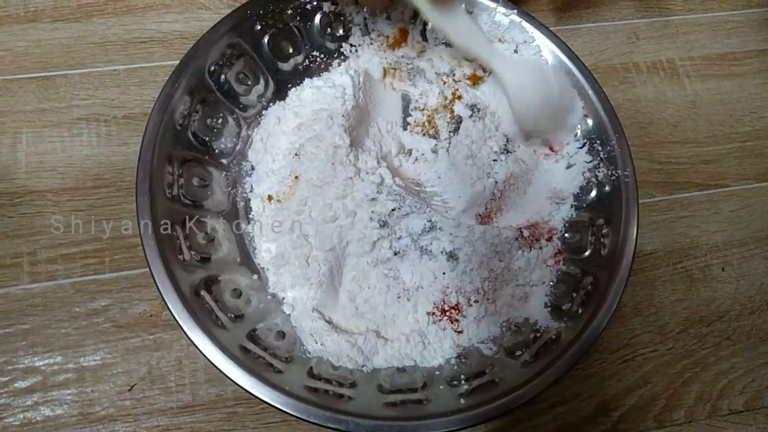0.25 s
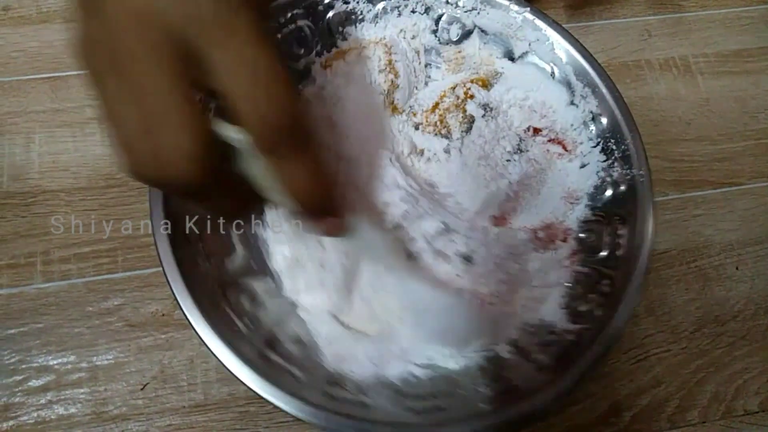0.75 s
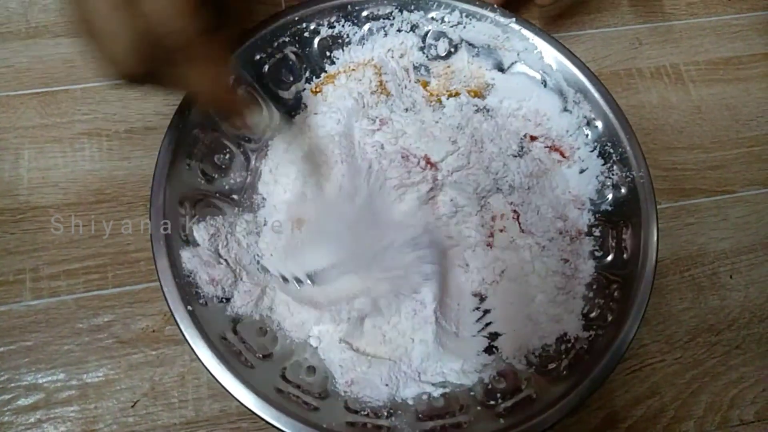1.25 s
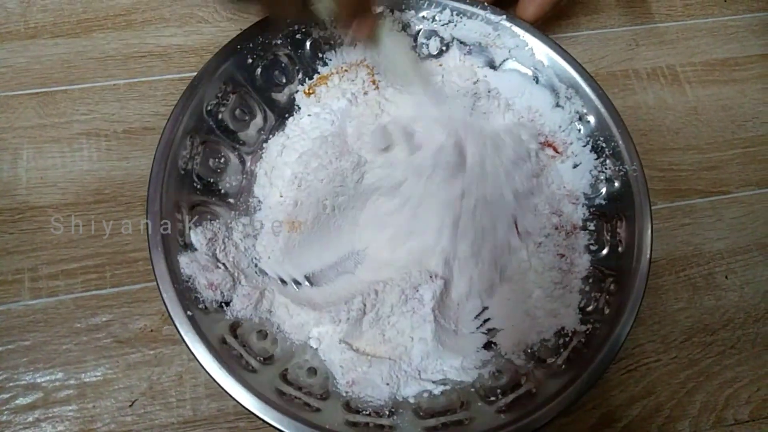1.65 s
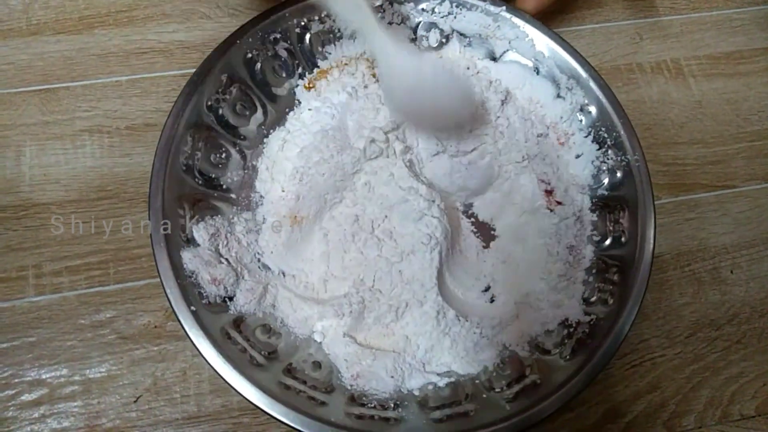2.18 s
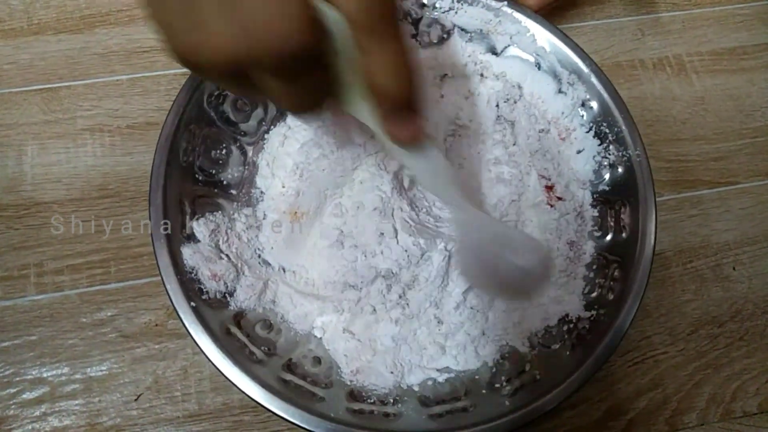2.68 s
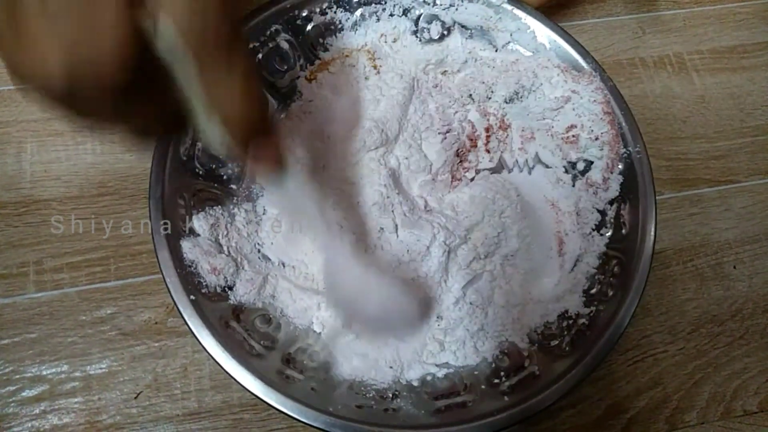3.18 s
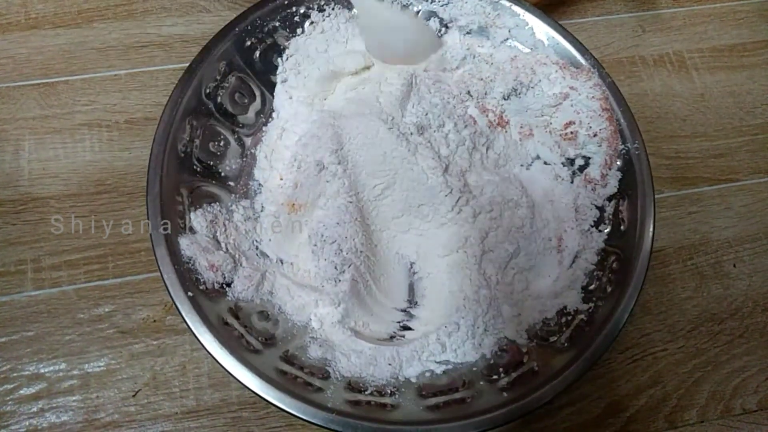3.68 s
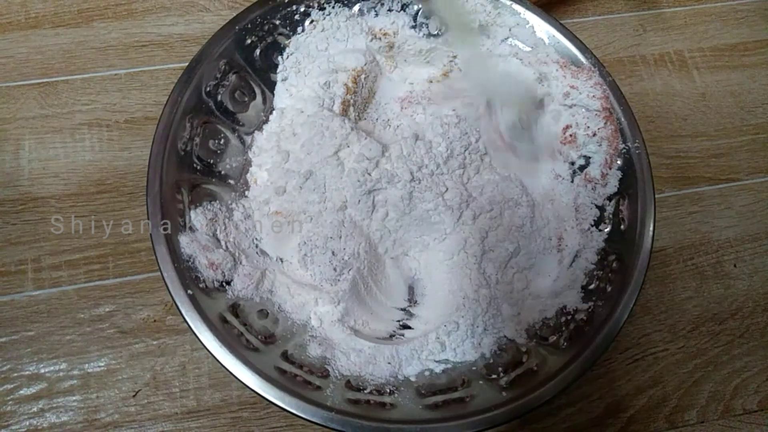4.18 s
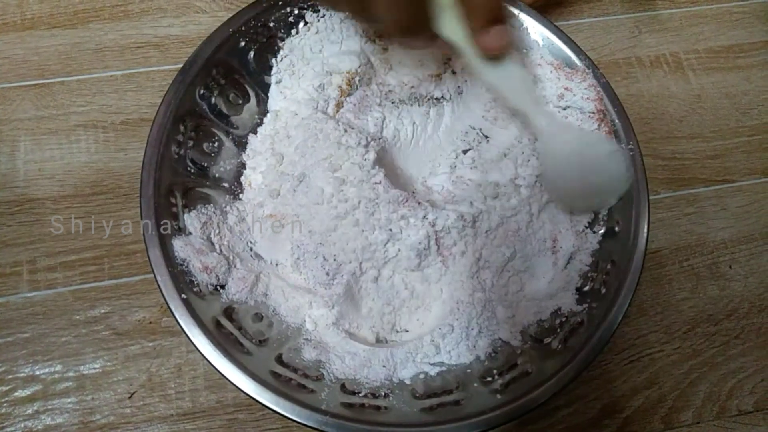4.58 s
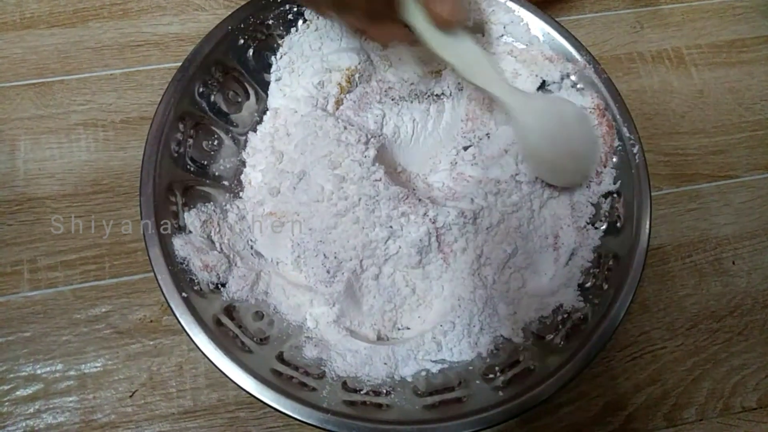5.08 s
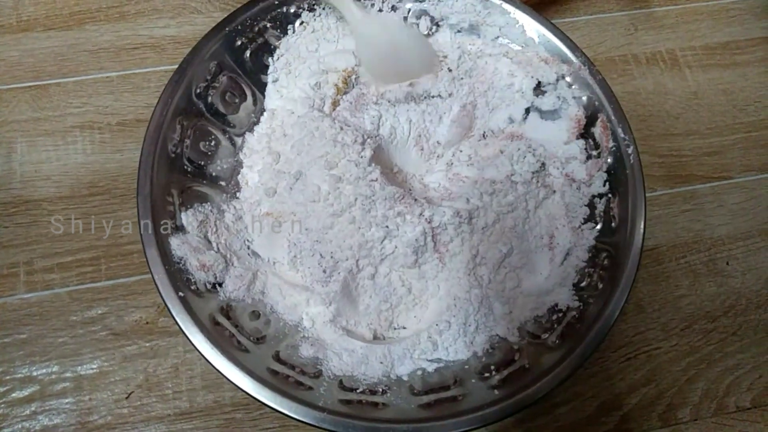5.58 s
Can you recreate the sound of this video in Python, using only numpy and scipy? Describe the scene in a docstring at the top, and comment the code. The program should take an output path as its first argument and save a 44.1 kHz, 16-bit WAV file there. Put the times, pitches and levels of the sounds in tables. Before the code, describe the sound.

In a small quiet kitchen, close to the microphone, a spoon works through powder in a metal dish. Irregular short scrapes come with gaps between them: some only muffled swishes, others ending in gritty scratches and clacks. A hard hollow rattle at three seconds is followed by more scrapes, a tapping cluster past four, and firm knocks after five. Low hum and rumble run underneath.

```python
"""Small kitchen with a low rumble, wavering hums and faint hiss: filtered noise and sines.
A plastic spoon stirs dry flour in a steel plate. Strokes land, glide and mostly dig in, as trains of tiny slips.
The slips drive four responses: drumming plate, ringing spoon, hiss through flour, bright scratch on bare steel.
Spoon contacts give knocks and ticks: a click plus a noisy skid into the same four responses.
Packed flour crunches: short narrow-band noise. Sparse decaying echoes add the room."""
import sys
import numpy as np
from scipy import signal
from scipy.fft import rfft, irfft
from scipy.io import wavfile
from scipy.ndimage import uniform_filter1d

SR = 44100
rng = np.random.default_rng(int(sys.argv[2]) if len(sys.argv) > 2 else 0)


def unload_audio(sound):
    """Save the sound as a 16-bit wav file, at the path given as the first command line argument."""
    columns = np.transpose(np.atleast_2d(sound))
    # keep every value between -1 and 1, then stretch to whole-number steps
    steps = np.round(np.clip(columns, -1, 1) * 32767)
    wavfile.write(sys.argv[1], SR, steps.astype(np.int16))


N = 257544
T = np.arange(N) / SR

# spoon lands and glides: t/s, length/s, spoon main mode f/Hz, plate pitch factor, hollow modes against push/dB,
# lightness of touch/0-1, tilt/dB per octave, then base levels: plate/dB, spoon/dB, scrape/dB
STROKES = [(0.0, 0.051, 1800, 0.8, -8, 0.16, 2.5, -77, -90, -70.5),
           (0.341, 0.23, 1862, 0.67, -3, 0.67, 3.5, -69, -61, -62),
           (0.854, 0.15, 1756, 0.54, -5.5, 0.22, 4, -55.5, -53, -54),
           (1.262, 0.15, 1813, 1.15, 8, 0.26, 5.5, -76, -66, -56.5),
           (1.775, 0.04, 1800, .6, 6, 0.2, 0.5, -72.5, -100, -63),
           (2.096, 0.12, 2280, 0.53, -3, 0.3, -0.5, -65, -65, -59.5),
           (2.491, .117, 1947, 1.38, 0, 0.16, -0.5, -60, -66.5, -54.5),
           (2.937, 0.052, 1790, 0.68, -1, 0.4, 0.5, -67, -76.5, -68.5),
           (2.987, 0.21, 1817, 0.92, -8, 0.68, 2.5, -52.5, -55.5, -62),
           (3.397, 0.091, 2370, 0.69, -1, 0.78, 4.5, -93, -69, -62),
           (3.851, 0.1, 1975, 0.86, 3, .6, 10, -77, -64, -69),
           (4.221, 0.18, 1790, 1.1, 17.5, 0.94, 4, -64, -58.5, -66.5),
           (4.763, 0.24, 1883, 1.25, 16, 0.94, -3, -72, -58.5, -61),
           (5.26, 0.15, 1856, 0.81, -0.5, 0.73, 2, -56, -50.5, -56),
           (5.695, .096, 2100, 1.1, -1, 0.4, 3.5, -84, -59, -65)]
# tip digs down to the steel, late in most strokes: t/s, length/s, plate pitch factor, tilt/dB per octave,
# plate level/dB, flour scrape level/dB, bare-steel level/dB (levels at full depth)
DIGS = [(0.499, 0.082, 0.49, -6, -69, -54, -59), (0.945, 0.06, .65, -7, -54.5, -55, -61),
        (0.986, 0.074, 0.63, 2, -65, -48, -45.5), (1.334, 0.069, 1.44, 4.5, -74.5, -49.5, -54),
        (2.129, 0.074, 0.58, -3.5, -71, -51, -63), (2.504, 0.081, 1.54, -3, -66.5, -54.5, -60.5),
        (3.108, 0.068, 1.18, -5.5, -46, -47.5, -55), (3.46, 0.057, 0.74, 0.5, -46, -51.5, -47.5),
        (3.885, 0.065, 0.864, -5, -49.5, -47.5, -45.5), (4.329, 0.065, 1.44, 0, -60.5, -61, -47),
        (5.398, 0.034, 2.7, 1, -58, -52.5, -57), (5.721, 0.085, 1, -0.5, -81, -49.5, -59)]
# spoon knocks, taps and judders against the plate: t/s, plate pitch factor, tilt/dB per octave,
# plate level/dB, spoon level/dB, tick level/dB, time for the skid to peak/s
KNOCKS = [(0.344, 0.66, 0, -75, -51, -65.5, .003), (0.418, 1.33, 1, -46, -37, -50.5, 0.0036),
          (0.428, 1.6, -9, -54, -41, -51.5, 0.0045), (0.4968, 0.61, -1, -58, -43, -37.5, 0.0015),
          (0.546, 1, 4.5, -80, -47.5, -48.5, 0.0017), (0.573, 2.03, 4, -47, -47.5, -55, 0.0011),
          (0.584, 2.05, 7.5, -52, -47.5, -53, .0016), (0.863, 0.626, 2.5, -44.5, -45.5, -43.5, 0.0008),
          (0.884, .6, 3, -57, -43.5, -51.5, 0.002), (0.987, 0.65, -5, -50, -49, -40, 0.00017),
          (1.0, 0.76, -2, -49, -71, -49, 0.00016), (2.095, .66, -5, -54, -58.5, -66, 0.0012),
          (2.193, 1, 2, -82, -82, -43.5, 0.0029), (2.497, 2.3, 0, -52.5, -50, -57, 0.0047),
          (2.9853, 0.94, 5, -39, -40.5, -56, 0.00036), (3.0441, .85, 5, -29.5, -46.5, -46, 0.000089),
          (3.0961, 1, 6, -36.5, -50.5, -51, 0.000071), (3.109, 1.1, -2, -40, -66, -56, 0.000086),
          (3.145, 1.28, 10.5, -47, -56, -47, .0012), (3.463, 0.77, -1, -42.5, -54, -50, 0.00084),
          (3.4767, 0.82, -5.5, -42, -56, -44, 0.00039), (3.49, 0.66, -2.5, -41.5, -47, -41, 0.0018),
          (3.877, 1.96, 3.5, -50, -51, -52.5, 0.0013), (3.893, 1.26, 1, -52.5, -49.5, -38, 0.0042),
          (4.226, 1.24, -0.5, -54.5, -48.5, -58, 0.0044), (4.289, 1.6, 18, -70, -64, -54.5, .001),
          (4.309, 1.7, -1, -49, -48, -57, 0.00075), (4.327, 1.46, -2, -51, -50, -47, 0.00042),
          (4.339, 1.55, -5, -53.5, -56, -42, 0.0025), (4.365, 1, .5, -74, -61, -38.5, 0.00024),
          (4.762, 1.18, -18.5, -52, -35.5, -43, 0.0013), (4.97, 0.67, 1, -55.5, -44, -52, 0.0012),
          (5.262, 0.82, 0, -39, -37.5, -47, 0.0015), (5.269, 0.58, -6, -46, -32, -41.5, 0.0019),
          (5.298, 0.54, -0.5, -45, -52, -47, 0.0022), (5.352, 1.5, 4, -76, -40.5, -50.5, 0.00095),
          (5.412, 4, -6, -44, -51, -51, 0.0017), (5.4234, 2.44, -2.5, -36.5, -54, -31, 0.00072),
          (5.44, 4, -13, -52, -44.5, -46, 0.00016)]
# packed flour gives way: t/s, length/s, centre f/Hz, level/dB
CRUNCHES = [(0.462, 0.11, 308, -53), (0.882, 0.18, 291, -52), (1.111, 0.074, 303, -56.5),
            (1.558, 0.13, 261, -59.5), (2.055, 0.16, 242, -52.5), (2.559, 0.14, 315, -58)]
# spoon's main pair of modes: factor on main mode, width/Hz before damping, relative level/dB
SPOON_MODES = [(0.968, 119, 8), (1.034, 156, -2)]
# spoon's higher modes, before shift and tilt: f/Hz, width/Hz, relative level/dB
OVERTONES = [(2240, 400, -1.5), (3120, 410, 3.5), (3760, 270, 2), (4360, 170, -1), (6153, 230, 3),
             (6650, 160, -10), (9650, 1300, -7), (10850, 890, -8)]
# hollow modes of the flour-laden plate: f/Hz, width/Hz, level/dB before the push is added
PLATE_MODES = [(272.6, 80, -0.5), (426, 140, -5.5), (827, 150, 7), (1400, 94, 7)]
# colour of the dull push on the plate, at pitch factor 1: f/Hz, relative level/dB
PLATE_PUSH = [(60, -37.5), (160, -12), (240, -1), (400, 9), (560, 3.5), (800, 8.5), (1050, -2),
              (1350, -23.5), (2400, -38), (6000, -62)]
# colour of the contact through flour, before shift and tilt: f/Hz, relative level/dB
MUFFLED = [(900, -69), (2700, -27), (3250, 4), (4300, 3.5), (5100, 3), (6200, 5.5), (6800, 3.5),
           (7400, -16.5), (8300, -8), (9300, -4), (11800, -13), (13500, -20.5), (15500, -56)]
# colour of the contact on bare steel, before tilt: f/Hz, relative level/dB
BARE_STEEL = [(300, -53), (1100, -20.5), (1500, -0.5), (2300, 9.5), (3000, 2), (4500, 4), (6700, 5.5),
              (7700, 2.5), (9500, -1.5), (12000, -30), (14000, -28), (15500, -61.5)]
# room decay: f/Hz, t60/s
ROOM = [(200, 0.37), (700, 0.23), (2000, 0.29), (6500, 0.25), (10000, 0.25), (15000, 0.24)]
# colour of the background noise: f/Hz, relative level/dB
FLOOR = [(20, -11.5), (36, -31.5), (50, -6.5), (75, -9), (115, 0), (160, -1), (210, -3), (260, -10),
         (330, -26), (450, -30.5), (1000, -34), (4000, -45.5), (6500, -45), (15000, -50)]
# background hums: f/Hz, level/dB before swell
HUMS = [(48.4, -71.5), (161.5, -57.5), (199.5, -65)]
# swell of rumble and hums, used about its mean and scaled by sway: t/s, level/dB
RUMBLE = [(0.0, -65), (0.06, -50.5), (0.63, -62), (0.83, -52.5), (1.67, -51), (1.76, -58.5), (2.05, -49.5),
          (2.99, -54.5), (3.11, -49), (3.27, -61), (3.46, -50), (4.06, -56), (4.08, -50), (5.27, -54.5),
          (5.35, -67.5), (5.84, -48.5)]

TOUCH_S, LIFT_S = 0.0012, 0.013  # start and end of a stroke
LANDING_S = 0.019  # decay constant of the landing's weight
LANDING_DB = (6, 5.5, -0.5)  # that weight on plate, spoon, scrape
EASE_DB_PER_S = (-76, -23, -3.5)  # hand eases off: plate, spoon, scrape
BURIED_DB = -3.5  # glide at full depth
GLIDE_STEEL_DB = -14.5  # bare steel against scrape, firmest touch
FLUTTER_DB = 4  # rms swing of the spoon's bursts
DIG_IN_S, DIG_OUT_S = 0.011, .02
DIG_SPOON_DB = -17  # buried spoon's ring against scrape
DIG_SAG = 0.96  # flour load lowers the spoon's main modes by this factor at full depth
KNOCK_STEEL_DB, DEEP_STEEL_DB = -13.5, 10  # bare steel against tick; added at full depth
FLOOR_DB, EDGE_HZ = -55, 15480


def strokes():
    """Spoon lands with some weight, rings in bursts as it glides, and is damped as it sinks into flour."""
    out = np.zeros(N)
    for start_s, length_s, hz, stiffness, hollow_db, light, tilt_db, *levels_db in STROKES:
        t = np.arange(0, length_s, 1 / SR)
        touch = held(t, length_s, TOUCH_S, LIFT_S) * gain_of(BURIED_DB * depth(start_s + t))
        plate, spoon, scrape = (
            touch * gain_of(level_db + landing_db * np.exp(-t / LANDING_S) + ease * t)
            for level_db, landing_db, ease in zip(levels_db, LANDING_DB, EASE_DB_PER_S))
        flutter = evened(gain_of(FLUTTER_DB * drift(SR, size=500))[:len(t)])
        steel = scrape * (1 - light) * gain_of(GLIDE_STEEL_DB)
        gains = plate, spoon * flutter, scrape, steel
        add(out, start_s, rub(gains, hz, hollow_db, light, stiffness, tilt_db))
    return out


def digs():
    """Tip ploughs through flour; the steel scratch grows as depth squared."""
    out = np.zeros(N)
    for start_s, length_s, stiffness, tilt_db, plate_db, scrape_db, steel_db in DIGS:
        t = np.arange(0, length_s, 1 / SR)
        deep = held(t, length_s, DIG_IN_S, DIG_OUT_S)
        plate = deep * gain_of(plate_db)
        scrape = deep * gain_of(scrape_db)
        spoon = scrape * gain_of(DIG_SPOON_DB)
        steel = deep ** 2 * gain_of(steel_db)
        middle_s = start_s + length_s / 2
        add(out, start_s, rub((plate, spoon, scrape, steel), *grip(middle_s), stiffness, tilt_db))
    return out


def knocks(chatter_per_ms=1.8, size=1200):
    """A sharp contact, then a skid that swells and dies; the longer the skid, the softer the knock."""
    out = np.zeros(N)
    t = np.arange(size) / SR
    blow = np.sqrt(.008 * SR)  # levels are rms as if spread over 8 ms
    for start_s, stiffness, tilt_db, plate_db, spoon_db, tick_db, skid_s in KNOCKS:
        skid = rng.standard_normal(size) * t * np.exp(-t / max(skid_s, 1 / SR))
        skid /= np.linalg.norm(skid)
        push = (t == 0) + chatter_per_ms * skid_s * 1000 * skid
        shift = 1 + 0.019 * rng.standard_normal()  # no two knocks land on the same spot
        rings = bodies(*grip(start_s), stiffness, tilt_db, shift, damping=0.97)
        steel_db = tick_db + KNOCK_STEEL_DB + DEEP_STEEL_DB * depth(start_s)
        for level_db, ring in zip((plate_db, spoon_db, tick_db, steel_db), rings):
            sound = signal.fftconvolve(push, ring)
            add(out, start_s, blow * gain_of(level_db) * sound / np.linalg.norm(sound))
    return out


def crunches(width_hz=40):
    """Flour shears under the spoon's bowl: a short, dull, fuzzy note of Gaussian-band noise."""
    out = np.zeros(N)
    f_hz = np.fft.rfftfreq(SR, 1 / SR)
    for start_s, length_s, hz, level_db in CRUNCHES:
        band = np.exp(-((f_hz - hz) / width_hz) ** 2 / 2)
        grain = irfft(rfft(rng.standard_normal(SR)) * band)[:int(length_s * SR)]
        add(out, start_s, gain_of(level_db) * evened(grain) * signal.windows.tukey(len(grain), .5))
    return out


def rub(gains, hz, hollow_db, light, stiffness, tilt_db, judder_db=2.0, wander=0.018):
    """Slips clump as the spoon judders; every short stretch of its path has its own resonances."""
    out = np.zeros(SR)
    length = len(gains[0])
    judder = gain_of(judder_db * drift(SR, size=170))
    drive = evened(slips(per_s=1300, spread_db=1.0, powder=0.31) * judder)
    shift = 1 + wander * drift(SR, size=5000)
    hop = 1500  # samples
    window = signal.windows.cosine(2 * hop)
    for start in range(-hop, length, hop):
        at = np.arange(max(start, 0), min(start + 2 * hop, length))
        rings = bodies(hz, hollow_db, light, stiffness, tilt_db, shift[at].mean(), damping=0.83)
        for gain, ring in zip(gains, rings):
            push = drive[at] * window[at - start] * gain[at]
            add(out, at[0] / SR, signal.fftconvolve(push, ring))
    return out


def slips(per_s, spread_db, powder):
    """One second of clicks of uneven size over the smooth rub of fine powder."""
    size = gain_of(spread_db * np.minimum(rng.exponential(1, SR), 3))
    sign = rng.choice([-1, 1], SR)
    clicks = size * sign * (rng.random(SR) < per_s / SR)
    return evened(evened(clicks) + powder * rng.standard_normal(SR))


def bodies(hz, hollow_db, light, stiffness, tilt_db, shift, damping):
    """Four contact responses: plate, spoon, through flour, on bare steel."""
    ripple_db = 4
    light = np.clip(light, 0, 1)
    # plate modes answer as far as the dull push reaches them
    push = tilted(PLATE_PUSH, stiffness, 0)
    hollow = ringing([(f, width, db + read(push, f)) for f, width, db in PLATE_MODES])
    hollow_gain = gain_of(hollow_db)
    plate = (body(push, ripple_db) + hollow_gain * hollow) / np.hypot(1, hollow_gain)
    spoon = ringing([(hz * k * shift, width * damping, db) for k, width, db in SPOON_MODES])
    # light touch: clear higher modes; pressed down: they blur into a hiss
    clear = ringing(tilted(OVERTONES, shift, tilt_db))
    blurred = body(tilted(MUFFLED, shift, tilt_db), ripple_db)
    scrape = (light * clear + (1 - light) * blurred) / np.hypot(light, 1 - light)
    steel = body(tilted(BARE_STEEL, 1, tilt_db), ripple_db)
    return plate, spoon, scrape, steel


def body(colour, ripple_db, size=2048):
    """Minimum-phase ring of energy 1; each place on the plate has its own ripple of resonances."""
    hz = np.fft.rfftfreq(size, 1 / SR)
    log_gain = np.log(gain_of(read(colour, hz) + ripple_db * drift(len(hz), size=10)))
    circle = np.r_[log_gain, log_gain[-2:0:-1]]
    # Hilbert transform of the log gain gives the phase
    ring = np.fft.ifft(np.exp(np.conj(signal.hilbert(circle)))).real
    return ring / np.linalg.norm(ring)


def ringing(modes, size=2048):
    """Modes that build up briefly, then die fast in the powder; energy 1."""
    t = np.arange(size) / SR
    ring = np.zeros(size)
    for hz, width_hz, db in modes:
        swell = width_hz ** (3 / 2) * t * np.exp(-np.pi * width_hz * t)
        ring += gain_of(db) * swell * np.sin(2 * np.pi * (hz * t + rng.random()))
    return ring / np.linalg.norm(ring)


def tilted(rows, shift, tilt_db):
    """Scales rows (f/Hz, .., level/dB) in pitch; tilts them by dB per octave about the treble pivot."""
    pivot_hz = 5000
    return [(f * shift, *rest, db + tilt_db * np.log2(f / pivot_hz)) for f, *rest, db in rows]


def depth(s):
    """Tip depth at time s: 0 on top of the flour, 1 on the steel."""
    dips = sum(held(s - start_s, length_s, DIG_IN_S, DIG_OUT_S) for start_s, length_s, *_ in DIGS)
    return np.minimum(dips, 1)


def grip(s):
    """Main mode/Hz, hollowness/dB and lightness of the stroke at time s; digging loads the spoon."""
    early_s = .01  # a stroke counts this long before its start
    _, _, hz, _, hollow_db, light, *_ = [row for row in STROKES if row[0] <= s + early_s][-1]
    return hz * DIG_SAG ** depth(s), hollow_db, light * (1 - depth(s))


def kitchen(x, count=5):
    """Diffuse room tail: crossfades round a ring of random echo sets."""
    turn = 4 * T  # rounds of the echo ring, 4 per second
    out = np.zeros(N)
    for k in range(count):
        away = abs((turn * count - k + count / 2) % count - count / 2)
        fade = np.cos(np.pi / 2 * np.minimum(away, 1))
        out += signal.oaconvolve(x * fade, reflections())[:N]
    return out


def reflections(gap_s=0.0023):
    """Sparse echoes of random sign, each band dying at its own speed; energy 1."""
    taps = rng.choice([-1., 1.], SR) * (rng.random(SR) < 1 / 10) * (T[:SR] > gap_s)
    hz, t, bands = signal.stft(taps, SR, nperseg=256)
    decay = gain_of(-60 * t / read(ROOM, hz)[:, None])
    tail = signal.istft(bands * decay, SR, nperseg=256)[1]
    return tail / np.linalg.norm(tail)


def background(sway=0.73, upper_db=-1, upper_swell_db=4.0):
    """Low rumble whose upper edge comes and goes, wavering hums, and faint steady hiss."""
    waver = .45
    hz = np.fft.rfftfreq(N, 1 / SR)
    white = rfft(rng.standard_normal(N))
    noise = gain_of(FLOOR_DB) * evened(irfft(white * gain_of(read(FLOOR, hz)), N))
    deep, low = (irfft(rfft(noise) / (1 + (hz / edge_hz) ** 12), N) for edge_hz in (205, 370))
    upper = (low - deep) * gain_of(upper_db + upper_swell_db * drift(N, size=6000))
    hum = np.zeros(N)
    for f, db in HUMS:
        strength = 1 + waver * drift(N, size=5000)
        tone = np.sin(2 * np.pi * f * T + drift(N, size=7000))
        hum += gain_of(db) * evened(strength * tone)
    swell_db = np.interp(T, *np.transpose(RUMBLE))
    hiss = noise - low
    return hiss + (deep + upper + hum) * gain_of(sway * (swell_db - swell_db.mean()))


def gain_of(db):
    """Decibels to amplitude."""
    return 10 ** (np.asarray(db) / 20)


def evened(x):
    """Scales to rms 1."""
    return x / np.sqrt(np.mean(x ** 2) + 1e-20)


def read(points, hz):
    """Interpolates a table along a log-frequency axis."""
    f, value = np.transpose(points)
    return np.interp(np.log(hz + 1), np.log(f + 1), value)


def add(mix, s, sound):
    """Mixes a sound in at time s."""
    part = mix[max(round(s * SR), 0):][:len(sound)]
    part += sound[:len(part)]


def drift(length, size):
    """Smoothed noise of rms 1 that changes over about size points."""
    noise = rng.standard_normal(length)
    return evened(uniform_filter1d(uniform_filter1d(noise, size), size))


def held(t, length_s, attack_s, release_s):
    """Linear attack, hold and release, between 0 and 1."""
    return np.clip(np.minimum(t / attack_s, (length_s - t) / release_s), 0, 1)


def scene(room_db=-8):
    """Stirring close by, its reflections, and the background."""
    stirring = strokes() + digs() + knocks() + crunches()
    return (stirring + gain_of(room_db) * kitchen(stirring) + background())[None]


def record(dry):
    """Low-pass at EDGE_HZ: the recorder's band limit."""
    low_pass = signal.firwin(511, EDGE_HZ, window=("kaiser", 9), fs=SR)
    return signal.oaconvolve(dry, low_pass[None], "same")


dry = scene()
out = record(dry)
unload_audio(out)
```